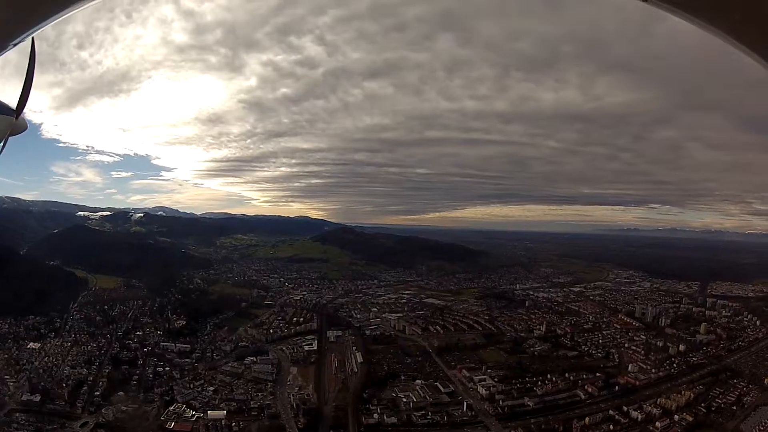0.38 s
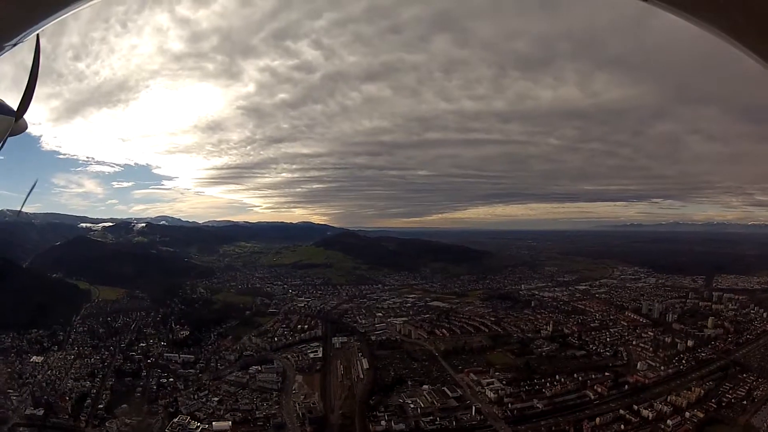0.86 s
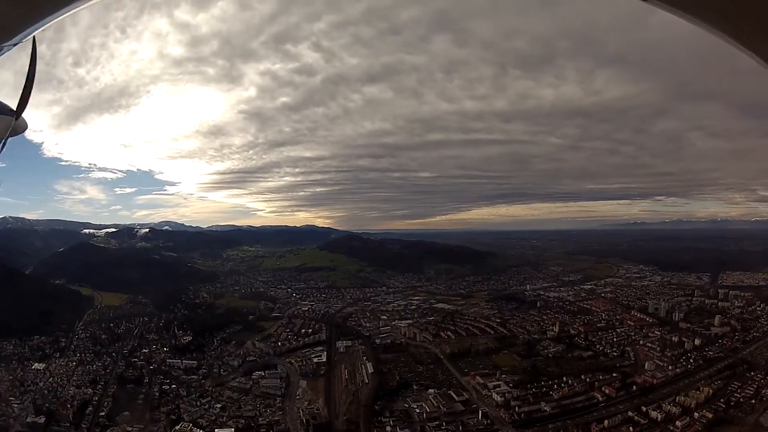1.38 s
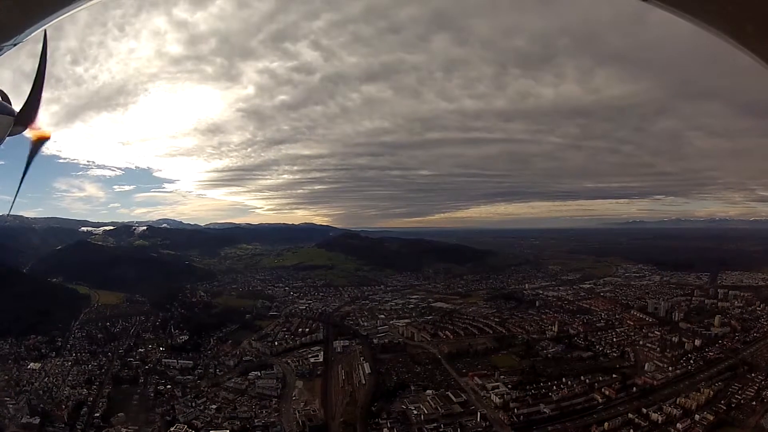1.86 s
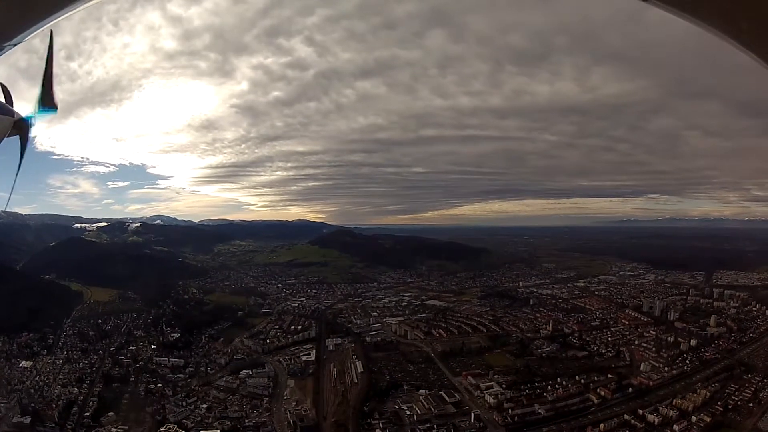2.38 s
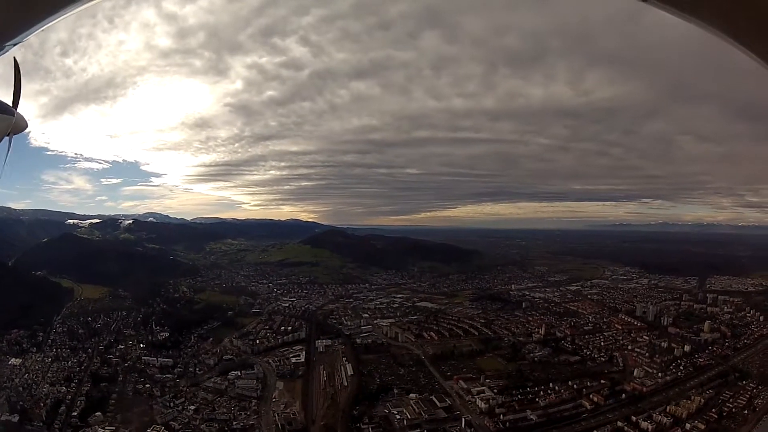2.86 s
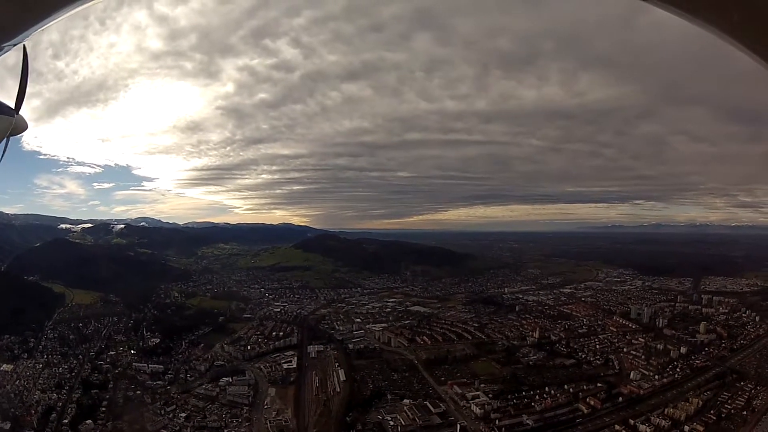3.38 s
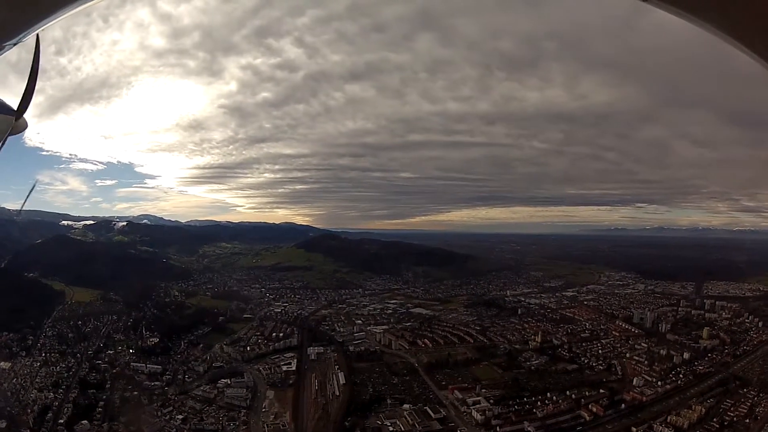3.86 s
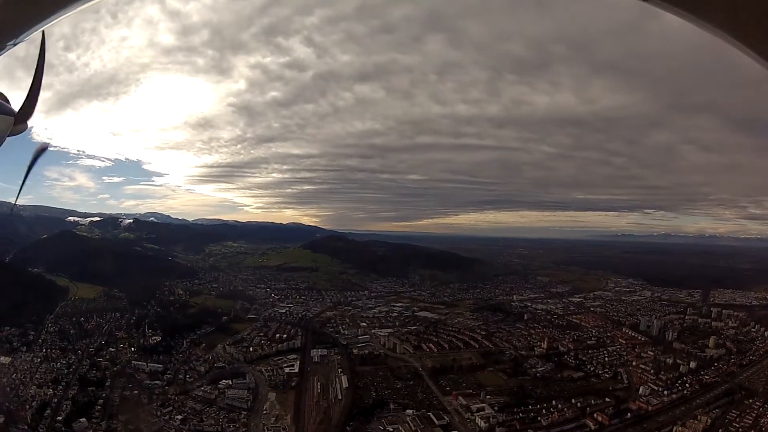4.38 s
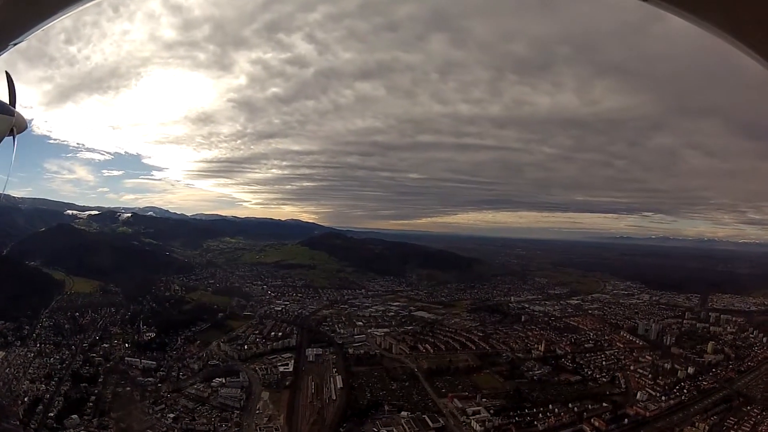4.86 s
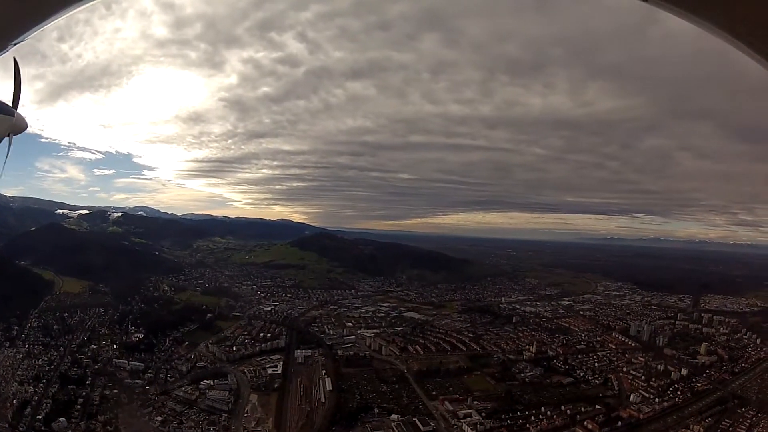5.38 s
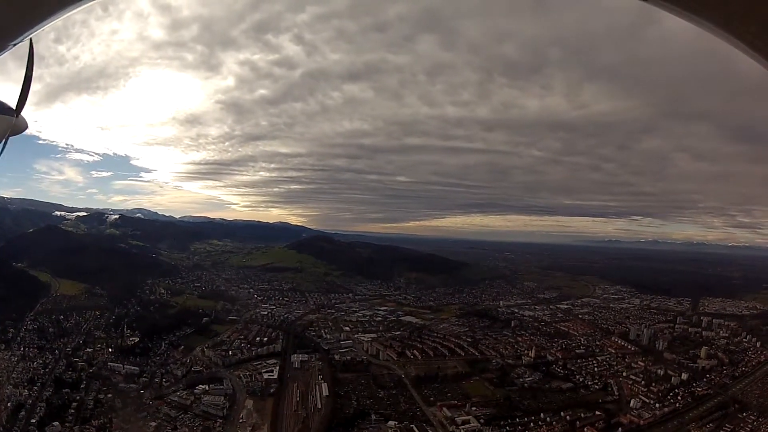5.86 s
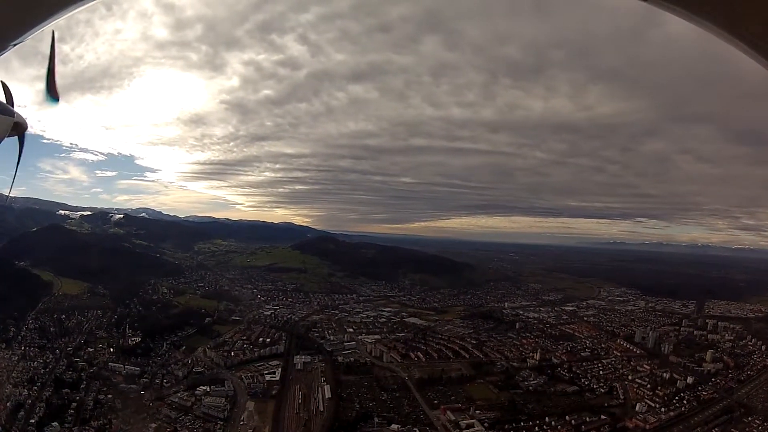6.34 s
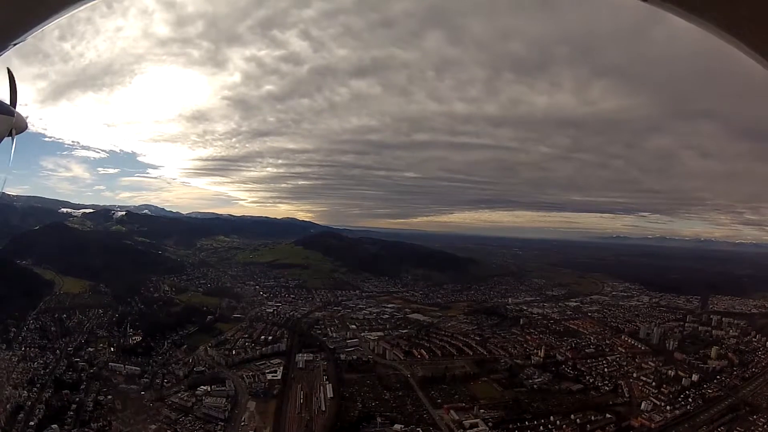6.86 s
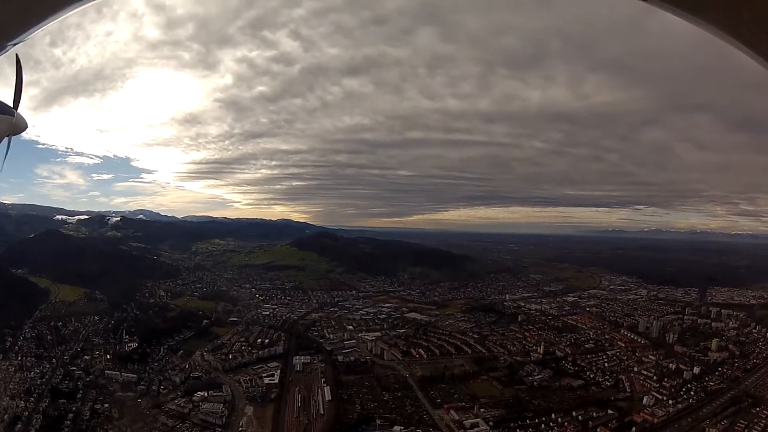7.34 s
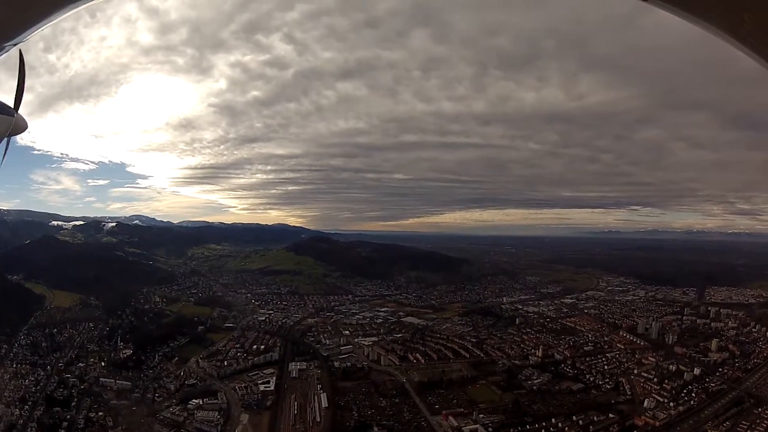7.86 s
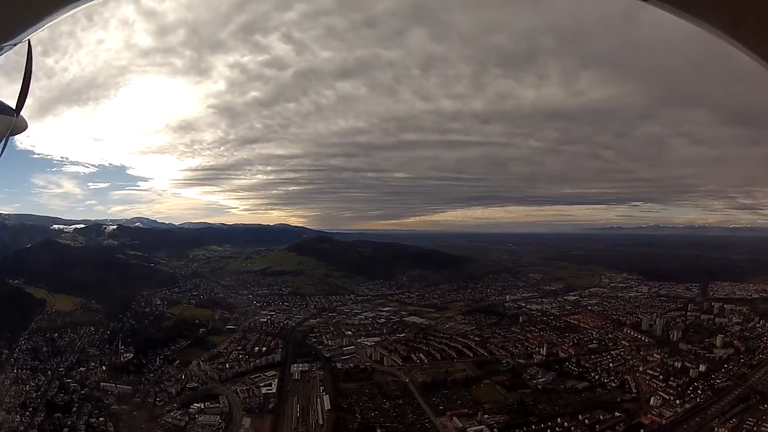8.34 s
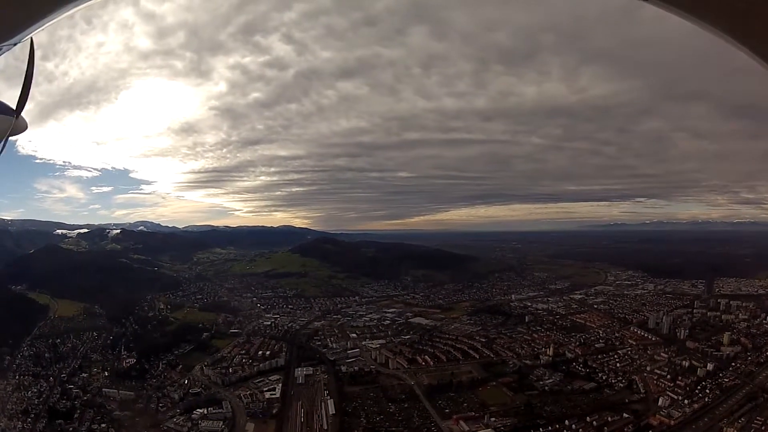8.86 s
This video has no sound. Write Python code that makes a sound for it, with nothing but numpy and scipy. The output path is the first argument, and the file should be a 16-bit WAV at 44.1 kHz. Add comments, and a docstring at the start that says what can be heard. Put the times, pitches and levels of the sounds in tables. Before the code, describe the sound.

From 0 to about 9 seconds, a small propeller aircraft flies steadily, heard from within its cabin by a small camera. The engine is already at high speed: a loud, deep buzzing hum around 155 hertz, with a weaker lower tone near 78. The three-blade propeller adds a hum near 96 hertz, beating against the engine about sixty times a second as a coarse, rapid throb. Mid-range whirr and a faint gear whine near 1600 hertz sit above. Dull airflow rumbles underneath, and panels buzz with fluttering hiss. Pitch stays almost constant, edging up slightly around 2 seconds, peaking gently near 3.3, settling by 3.7, then drifting a little higher until about 7 and easing back. The mono sound is compressed, clipped and gritty, with faint brittle digital overtones. There are no separate events or pauses; the drone continues to the end.

```python
"""Cabin of a light aircraft in cruise: a small camera hears the drone through the airframe.
A four-cylinder four-stroke repeats one pattern every two turns and drives a three-blade propeller
through a 21:51 gear; both are sums of tones. Shaped noise rumbles as airflow and rings the panels.
The camera overloads, backs its gain off and holds each of its 12000 samples a second as a step."""
import sys
import numpy as np
from scipy import signal
from scipy.fft import rfft, irfft, next_fast_len
from scipy.io import wavfile

SR = 44100
rng = np.random.default_rng(int(sys.argv[2]) if len(sys.argv) > 2 else 0)


def amplitude_ratio(level_db):
    """Convert a level in decibels to the matching linear amplitude (field) ratio."""
    exponent = np.asarray(level_db, float) / 20
    return 10 ** exponent


def int16_out(signal):
    """Quantize to a 16-bit WAV file."""
    q = np.round(np.clip(np.atleast_2d(signal).T, -1, 1) * 32767)
    wavfile.write(sys.argv[1], SR, q.astype(np.int16))


N = 396011

# Levels in these tables are means, ahead of the camera's input gain.
# Airflow and panel rumble: (frequency [Hz], density [dB per Hz])
RUMBLE_SPECTRUM = [(20, -82), (60, -72.5), (85, -56.5), (110, -56.5), (175, -62.5), (215, -70),
                   (245, -79.5), (500, -86.5), (680, -83), (790, -87.5), (1250, -91), (1900, -87.5),
                   (2400, -96), (2950, -104), (3450, -107), (4300, -110), (5900, -112)]
# Cabin panel resonances: (frequency [Hz], width of one filter pass [Hz], level [dB rms], flutter [dB])
PANEL_RESONANCES = [(1004, 190, -50, 3), (1964, 320, -66, 2.5), (2820, 120, -78.5, 2), (3200, 370, -77, 1),
                    (3667, 350, -71, 0.5)]
# Sum tones, each one blade-passing pitch above an engine tone: (multiple of two-turn cycle, level [dB rms])
SUM_TONE_LEVELS = [(1, -57), (2, -58.5), (3, -58), (4, -61.5), (5, -68.5), (9, -70.5), (12, -71.5),
                   (13, -71), (15, -64), (16, -70)]
# Propeller tones, 3 is the blade passing: (multiple of propeller turn, level [dB rms])
BLADE_TONES = [(2, -66), (3, -29.5), (4, -57), (6, -38.5), (9, -68.5)]
# Engine tones, 4 is the firing, 42 the mesh of the 21-tooth pinion:
# (multiple of two-turn cycle, level [dB rms])
ENGINE_TONES = [(1, -62), (2, -41.5), (3, -49), (4, -21.5), (5, -40), (6, -52), (7, -54), (8, -60),
                (9, -58), (10, -71), (11, -62.5), (12, -71.5), (13, -69), (14, -75.5), (15, -52.5),
                (16, -63), (17, -63.5), (18, -67), (19, -56.5), (20, -74), (21, -60.5), (22, -59),
                (23, -47.5), (24, -58.5), (25, -49.5), (26, -48.5), (27, -59.5), (28, -58), (29, -57.5),
                (30, -71), (31, -72.5), (32, -71), (33, -70.5), (34, -73), (35, -71), (36, -76),
                (37, -65.5), (39, -74), (40, -76.5), (41, -68), (42, -54.5), (43, -72), (45, -72.5),
                (46, -75.5), (47, -65.5), (48, -66), (49, -67), (50, -75.5), (51, -71.5), (52, -73.5),
                (53, -75), (54, -81), (55, -75.5), (58, -80), (61, -83), (62, -85.5)]
# Crankshaft: (time [s], speed [rpm])
CRANK_SPEED = [(0.0, 4667.0), (0.5, 4664.8), (1.7, 4663.1), (2.1, 4676.4), (2.8, 4677.9), (3.3, 4704.9),
               (3.7, 4676.9), (4.7, 4679.9), (5.6, 4687.7), (6.9, 4690.3), (7.5, 4674.6), (8.1, 4677.4),
               (8.98, 4666.2)]

GEAR = 21 / 51  # propeller turns per crank turn
CRANK_START_CYCLES, PROP_OFFSET_TURNS = -0.057, -0.013
CLIP_LEVEL, KNEE = 0.1772, 360  # full scale = 1; higher KNEE = sharper overload corner
HELD_HZ = 12000  # camera sampling rate


def in_time(rows):
    """Join curve rows by straight lines."""
    time_s, value = np.transpose(rows)
    return np.interp(np.arange(N) / SR, time_s, value)


def rms_one(x):
    """Scale to rms 1."""
    return x / np.sqrt(np.mean(x ** 2))


def drift(corner_hz):
    """Slow chance: noise at every 40th sample through two one-pole low-passes; rms 1."""
    r = np.exp(-2 * np.pi * corner_hz * 40 / SR)
    noise = rng.standard_normal(N // 40 + 2002)
    slow = signal.lfilter([1], [1, -2 * r, r * r], noise)[2000:]  # drop the filter's settling
    return np.interp(np.arange(N) / 40, np.arange(len(slow)), rms_one(slow))


def tone(turns, phase_rad=0):
    """Sinusoid of rms 1 from a running count of turns."""
    return np.sqrt(2) * np.cos(2 * np.pi * turns + phase_rad)


def airflow():
    """Noise shaped by the rumble spectrum, slowly gusting."""
    size = next_fast_len(N)
    hz = np.maximum(np.arange(size // 2 + 1) * SR / size, 1)
    table_hz, table_db = np.transpose(RUMBLE_SPECTRUM)
    density = amplitude_ratio(np.interp(np.log(hz), np.log(table_hz), table_db))
    white = rfft(rng.standard_normal(size))
    rumble = irfft(white * density * np.sqrt(SR / 2), size)[:N]
    gust_db = 1.0 * drift(4.0)
    return rumble * amplitude_ratio(gust_db)


def panels(cycles):
    """Noise puffed at every firing rings each panel resonance; loose panels flutter."""
    puffs = amplitude_ratio(1.6 * np.cos(2 * np.pi * 4 * cycles))
    flutter = drift(40.0)  # shared by all panels
    out = np.zeros(N)
    for hz, width_hz, level_db, flutter_db in PANEL_RESONANCES:
        r = np.exp(-np.pi * width_hz / SR)
        poles = [1, -2 * r * np.cos(2 * np.pi * hz / SR), r * r]
        driven = puffs * amplitude_ratio(flutter_db * flutter) * rng.standard_normal(N)
        once = signal.lfilter([1, 0, -1], poles, driven)
        twice = signal.lfilter([1], poles, once)  # steeper flanks
        out += amplitude_ratio(level_db) * rms_one(twice)
    return out


def sum_tones(cycles, prop_turns):
    """Blade passing and engine tones mix, probably in the shaking mount, into faint tones between."""
    out = np.zeros(N)
    for order, level_db in SUM_TONE_LEVELS:
        waver_db = 1.1 * drift(8.0)
        turns = order * cycles + 3 * prop_turns + rng.random()
        out += amplitude_ratio(level_db + waver_db) * tone(turns)
    return out


def propeller(prop_turns):
    """Blade tones; gusts through the disc make them swell and sway together."""
    gust_db = 0.7 * drift(3.0)
    out = np.zeros(N)
    for order, level_db in BLADE_TONES:
        out += amplitude_ratio(level_db + gust_db) * tone(order * prop_turns, -np.pi / 2)
    return out


def shake(prop_turns):
    """Each passing blade shakes the mount and swells the upper engine tones."""
    return 1 + 0.16 * np.cos(2 * np.pi * 3 * prop_turns)


def engine(cycles, prop_turns):
    """Steady tones on the two-turn cycle; no two cycles burn alike, so the upper ones waver more."""
    low_tone_lag_rad = 0.9  # start phases of the low tones follow a curve over their order
    timing_cycles = 0.00055 * drift(3.9)  # early or late, shared by all tones
    swell = shake(prop_turns)
    out = np.zeros(N)
    for order, level_db in ENGINE_TONES:
        if order < 5.5:
            phase_rad = -low_tone_lag_rad * (order - 2) * (order - 4)
            waver_db, swing = 0.4 * drift(12.0), 1
        else:
            phase_rad = rng.uniform(0, 2 * np.pi)  # random start phase for each upper tone
            waver_db, swing = 1.5 * drift(12.0), swell
        out += amplitude_ratio(level_db + waver_db) * tone(order * (cycles + timing_cycles), phase_rad) * swing
    return out


def gain_control(x):
    """Gain drops just after a peak passes the overload level, then climbs back steadily."""
    duck_db_per_db, attack_s, recover_db_per_s = 0.66, 0.0065, 25
    excess_db = np.maximum(20 * np.log10(np.abs(x) / CLIP_LEVEL + 1e-9), 0)
    climb_db = recover_db_per_s * np.arange(x.shape[1]) / HELD_HZ
    # running maximum on a rising ramp = peak hold with linear release
    held_db = np.maximum.accumulate(duck_db_per_db * excess_db + climb_db, axis=1) - climb_db
    r = np.exp(-1 / (attack_s * HELD_HZ))
    reduction_db = signal.lfilter([1 - r], [1, -r], held_db, axis=1)
    return x * amplitude_ratio(-reduction_db)


def scene():
    """Airflow, panels, propeller and engine at the camera, one channel."""
    cycles = CRANK_START_CYCLES + np.cumsum(in_time(CRANK_SPEED)) / 120 / SR  # two turns each
    slack_turns = 0.003 * drift(0.73)  # play in the gear coupling
    prop_turns = PROP_OFFSET_TURNS + 2 * GEAR * cycles + slack_turns
    background = airflow() + panels(cycles) + sum_tones(cycles, prop_turns)
    return (background + propeller(prop_turns) + engine(cycles, prop_turns))[None]


def top_cut(x):
    """Nothing passes above the cut-off."""
    return signal.sosfilt(signal.butter(12, 15490, fs=SR, output="sos"), x)


def record(dry):
    """Sampled slowly, levelled, clipped, held as steps: the drone mirrors round the sampling rate."""
    input_gain_db = 1.43
    sampled = signal.resample_poly(dry * amplitude_ratio(input_gain_db), HELD_HZ, SR, axis=1)
    levelled = gain_control(sampled)
    clipped = levelled / (1 + np.abs(levelled / CLIP_LEVEL) ** KNEE) ** (1 / KNEE)
    steps = np.repeat(clipped, 4, axis=1)
    mix = signal.resample_poly(steps, SR, 4 * HELD_HZ, axis=1)[:, :N]
    return top_cut(mix)


dry = scene()
out = record(dry)
int16_out(out)
```